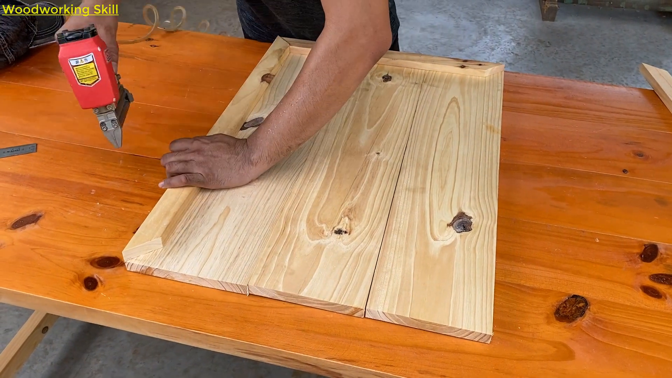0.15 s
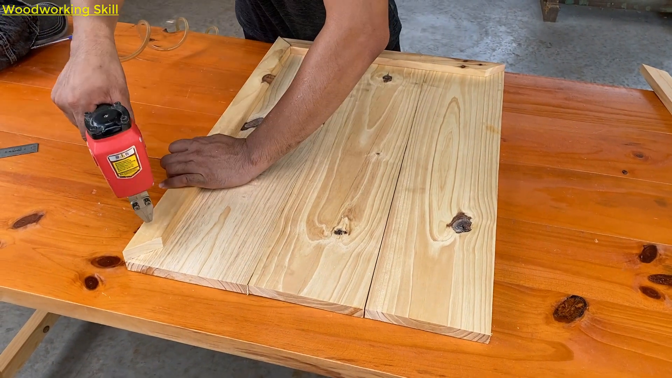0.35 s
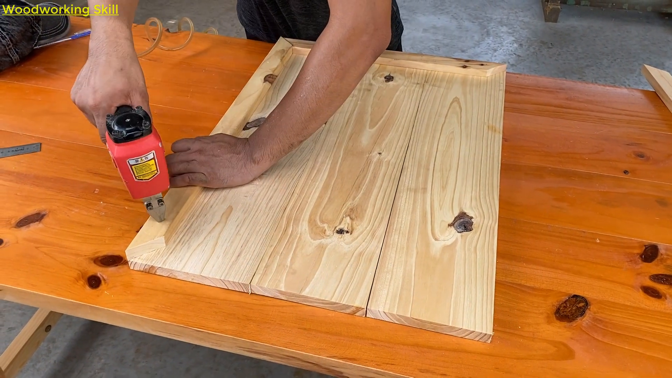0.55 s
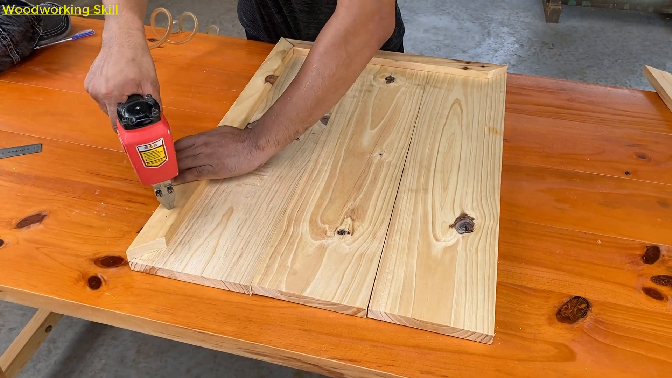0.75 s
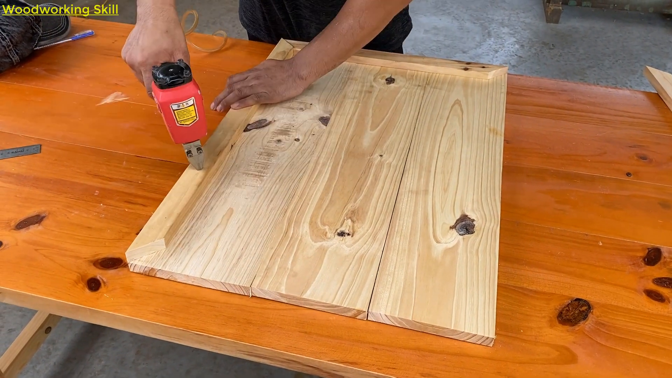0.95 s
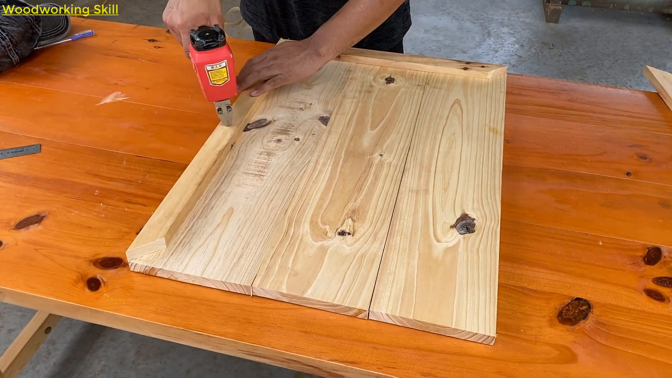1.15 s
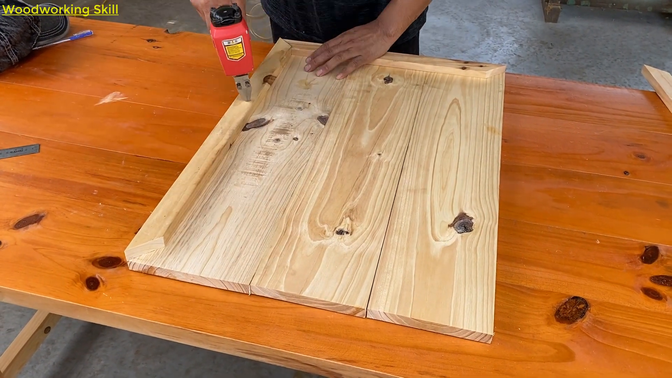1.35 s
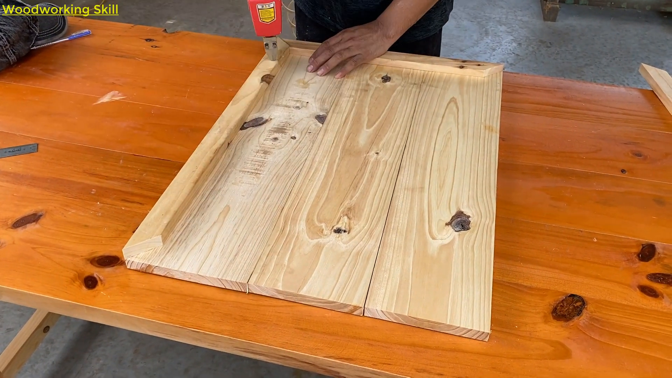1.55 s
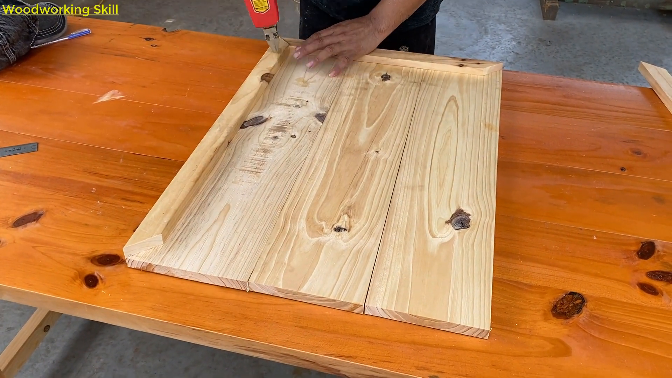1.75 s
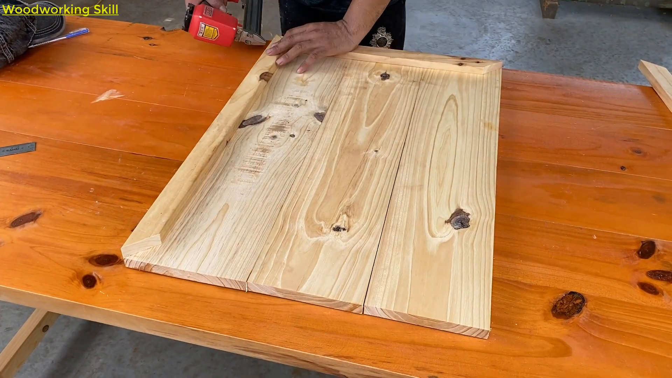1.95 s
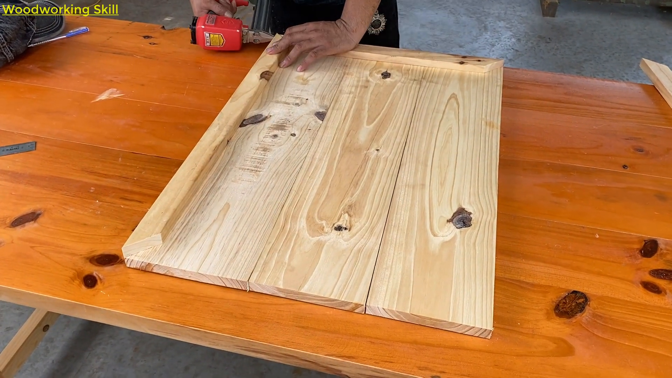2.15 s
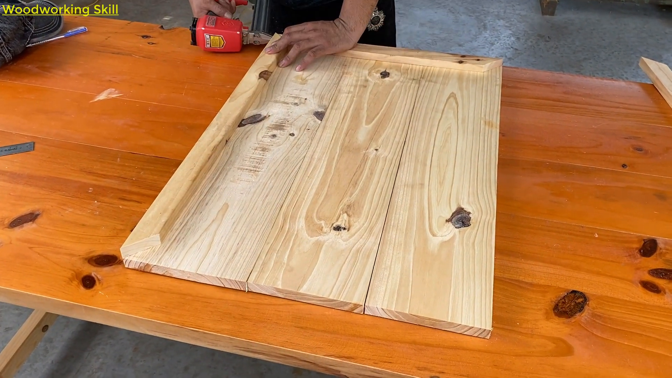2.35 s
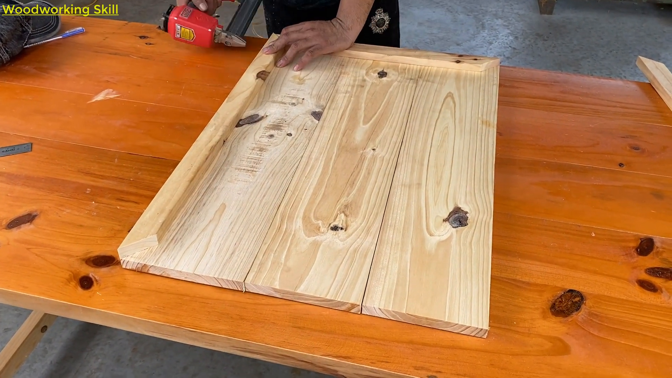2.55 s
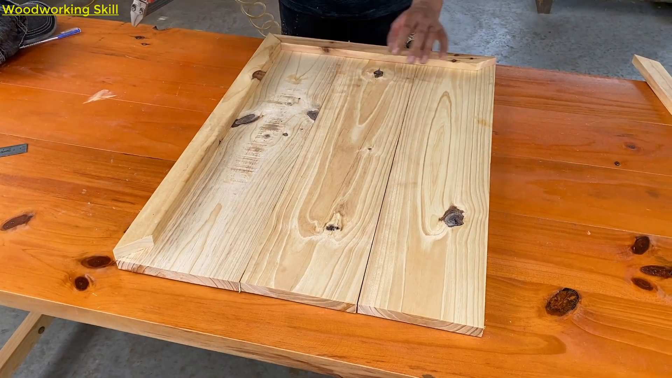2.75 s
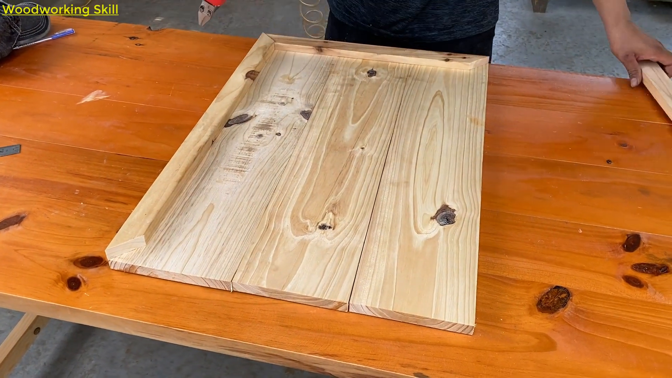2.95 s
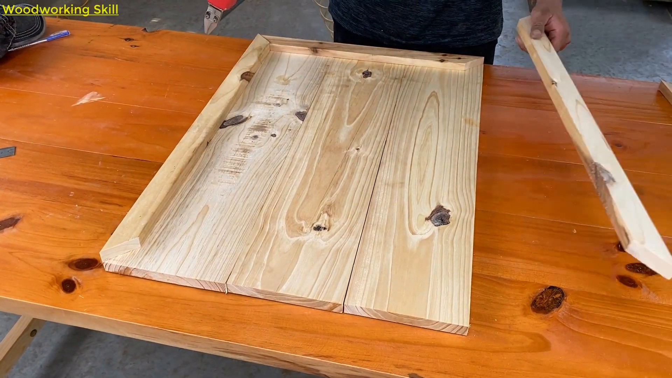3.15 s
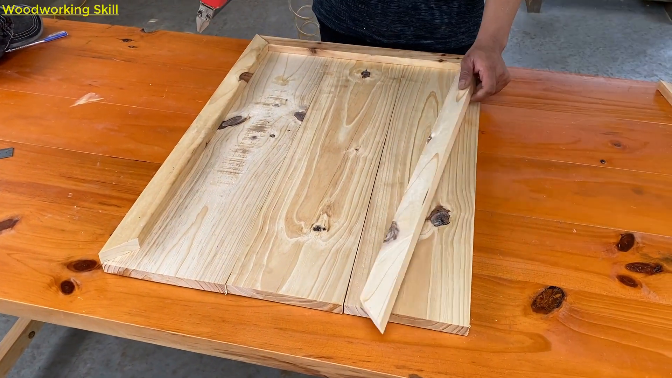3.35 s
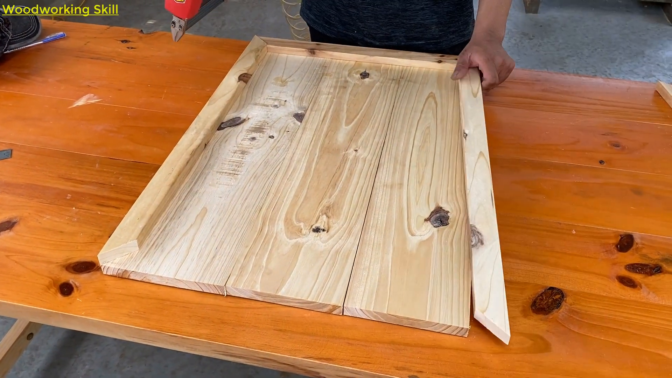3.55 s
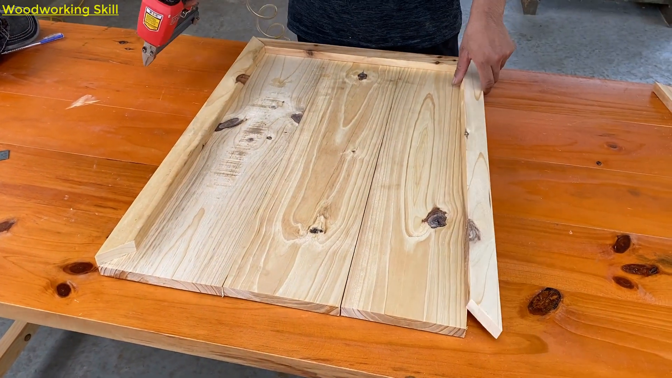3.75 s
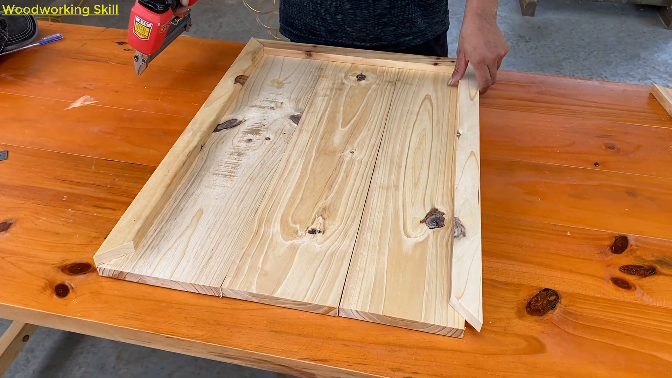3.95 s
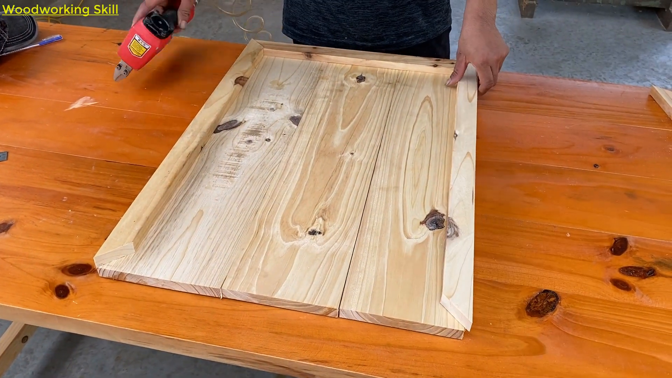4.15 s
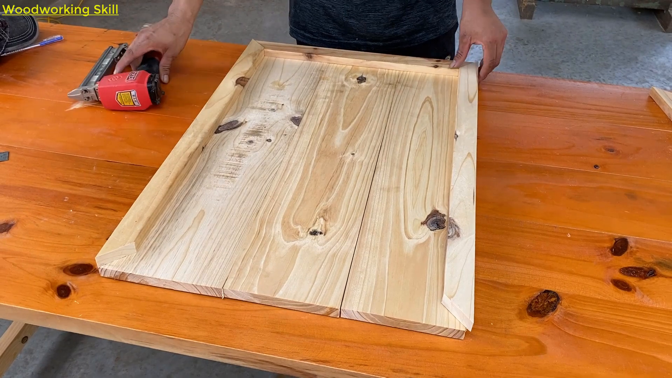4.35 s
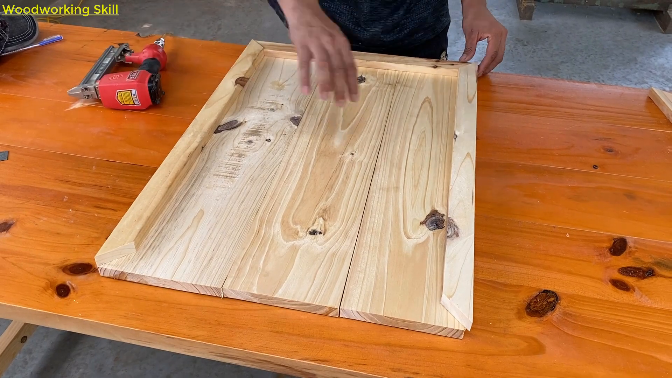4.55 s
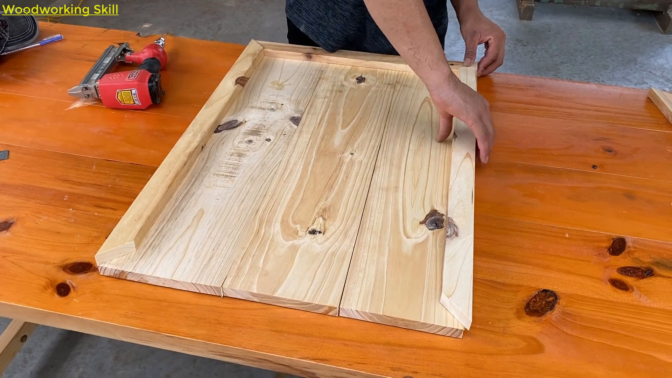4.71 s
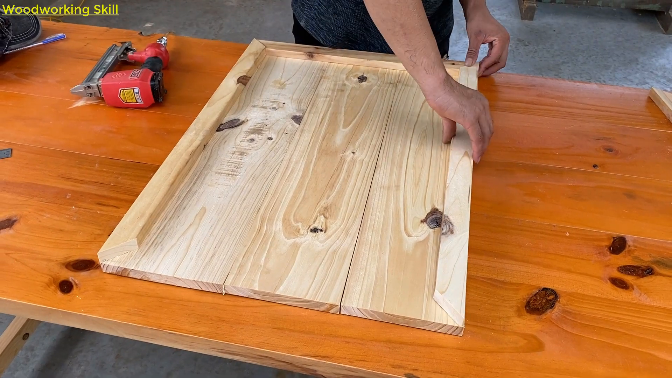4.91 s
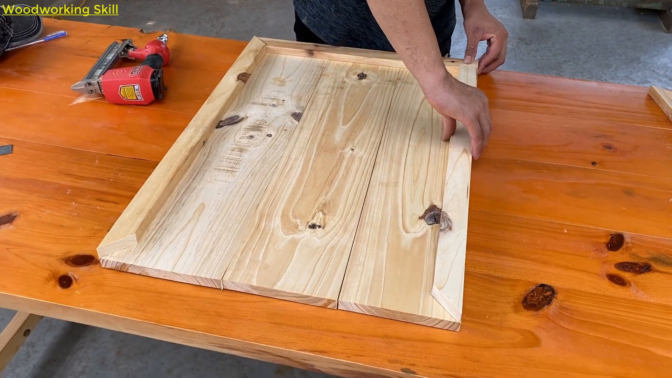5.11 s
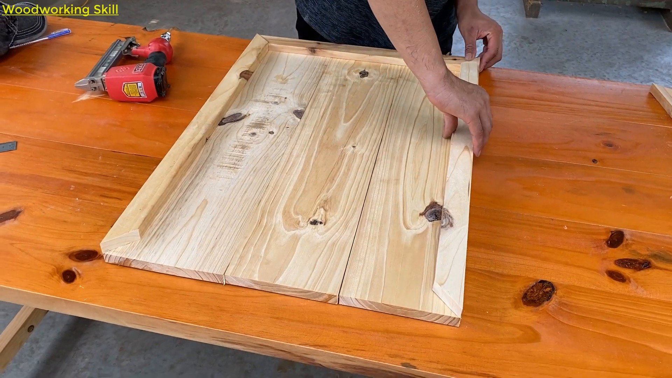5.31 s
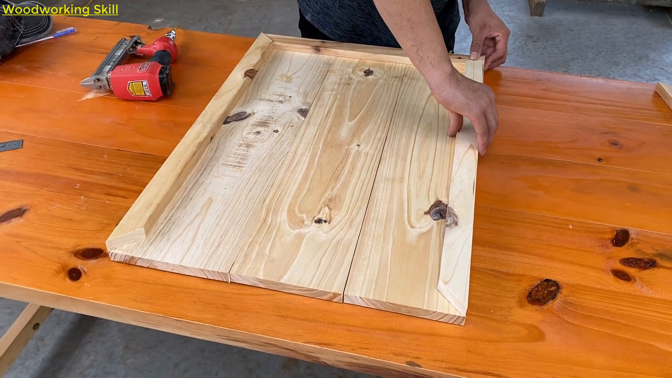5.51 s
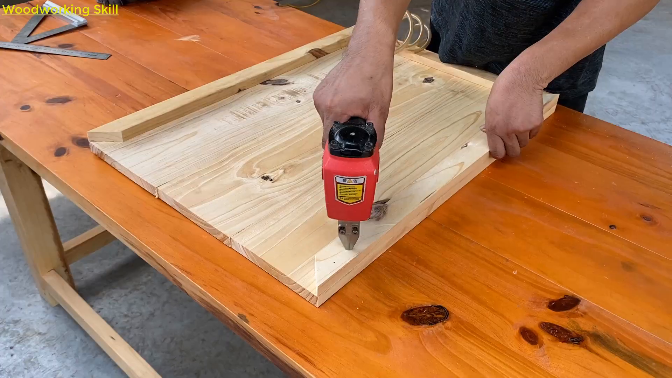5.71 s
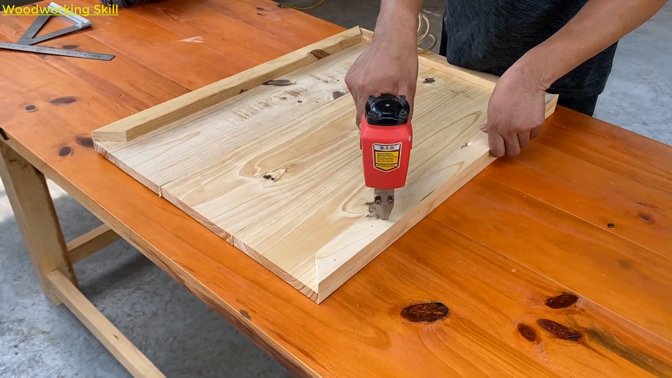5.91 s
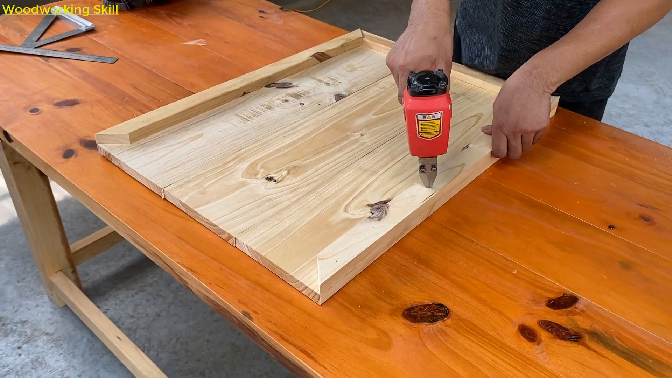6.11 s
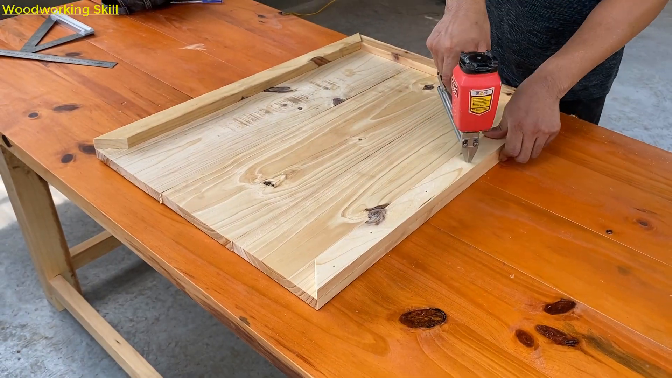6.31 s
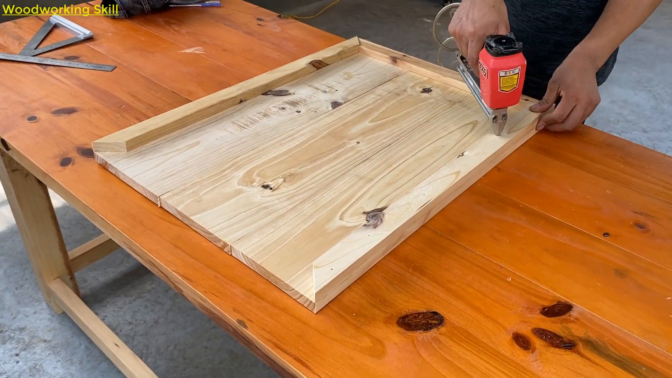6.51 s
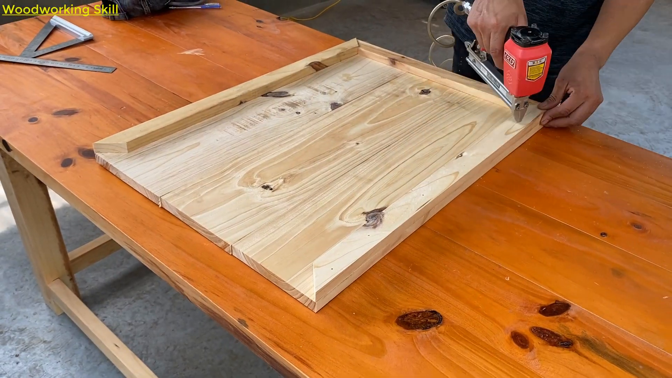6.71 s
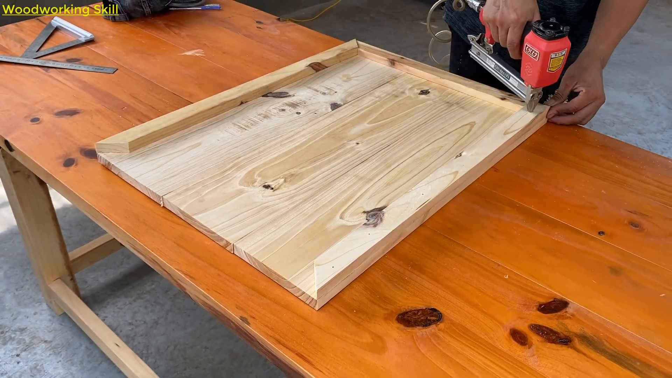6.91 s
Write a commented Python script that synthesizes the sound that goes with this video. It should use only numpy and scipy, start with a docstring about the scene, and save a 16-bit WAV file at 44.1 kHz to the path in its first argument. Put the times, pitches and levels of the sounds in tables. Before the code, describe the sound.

Quiet workshop air with low, lumpy rumble; soft hand bumps and a light knock at 0.2-0.46 s. A close nail gun fires at about 0.5, 0.7, 1.0, 1.3, 1.7 and 2.5 s: a tiny valve hiss, a very hard steel-and-wood crack, then about 70 ms later a sharp air spit with a low pop or thump and a clack. A faint thin spring ring and short diffuse room wash trail each shot. From 3 s it is quiet: a batten knocks on the panel at 3.4-3.75, sleeve and hose scuff around 4.0-4.4, and the gun is put down in clustered knocks at 4.27-4.5. Far dove-like coos recur faintly; whistles and tiny high chirps appear from 4.5 to 5.6. A 20 ms dropout at 5.74 returns in a dying ring, then five shots at 5.9, 6.15, 6.4, 6.65 and 6.97, with the earlier vents thumping harder.

```python
"""A pneumatic nail gun fixes battens to a pine panel on a workbench, in two short runs.
Each shot: valve hiss (noise), driver slam (noise cracks, damped wood and steel modes); some 70 ms later
the air vents as hiss and gliding pressure swings. Between runs a batten is laid on and the gun put down:
modal knocks, bumps and noise scuffs. A short dropout precedes the second run. The workshop answers with
a diffuse noise wash; gliding tones coo and whistle, noise chirps, over still air and low rumble."""
import sys
import numpy as np
from scipy import signal
from scipy.fft import rfft, irfft, next_fast_len
from scipy.io import wavfile
from scipy.ndimage import uniform_filter1d

SR = 44100
rng = np.random.default_rng(int(sys.argv[2]) if len(sys.argv) > 2 else 0)


def to_wav(s):
    """Save 16-bit WAV."""
    ch = np.atleast_2d(s).T  # columns
    pcm = np.round(np.clip(ch, -1, 1) * 32767)  # PCM
    wavfile.write(sys.argv[1], SR, pcm.astype(np.int16))


N = 311787
T = np.arange(SR // 2) / SR  # time since an event (s)
LEFT_RIGHT = np.array([[1], [-1]])  # opposite signs on the two sides


def amp(db):
    """Decibels to gain."""
    return 10 ** (np.asarray(db) / 20)


def unit(x):
    """Scale to rms 1."""
    return x / np.sqrt(np.mean(x ** 2) + 1e-20)


def burst(x, seconds):
    """Scale a short sound to the energy of rms 1 held for that long."""
    return x * np.sqrt(seconds * SR / np.mean(np.sum(x ** 2, -1)))


def along(points, hz):
    """Interpolate (Hz, value) points on a log-frequency axis."""
    point_hz, value = np.transpose(points)
    return np.interp(np.log(hz + 1), np.log(point_hz + 1), value)


def curve(rows):
    """Interpolate (s, value) rows to one value per sample."""
    return np.interp(np.arange(N) / SR, *np.transpose(rows))


def filtered(x, response):
    """Multiply the spectrum of x by a response of frequency."""
    n = x.shape[-1]
    padded = next_fast_len(n + 4096)
    spectrum = rfft(x, padded) * response(np.fft.rfftfreq(padded, 1 / SR))
    return irfft(spectrum, padded)[..., :n]


def noise(spectrum, size=len(T)):
    """Coloured mono noise of rms 1."""
    return unit(filtered(rng.standard_normal(size), lambda hz: amp(along(spectrum, hz))))


# Left-right likeness of diffuse sound. Each row: frequency in Hz, correlation 0-1.
LIKENESS = [(60, 1), (380, .9), (950, 0.73), (2400, 0.12), (6000, 0.2), (15000, 0.22)]


def diffuse(spectrum, size=len(T)):
    """Coloured noise from all sides: left and right are alike mainly in the bass."""
    def mid_side_gain(hz):
        angle = np.arccos(np.clip(along(LIKENESS, hz), -1, 1)) / 2
        return amp(along(spectrum, hz)) * [np.cos(angle), np.sin(angle)]

    mid, side = filtered(rng.standard_normal((2, size)), mid_side_gain)
    return unit(np.array([mid + side, mid - side]))


def swell(rise, t60):
    """An envelope that builds up and dies away (both in s)."""
    return (1 - np.exp(-(T / rise) ** 2)) * amp(-60 * T / t60)


def ring(modes, scatter_db=4.5, detune=0.066):
    """Damped modes; each blow lands elsewhere, so strengths and pitches vary."""
    hz, db, t60 = np.transpose(modes)[:, :, None]
    level_draw, pitch_draw = rng.standard_normal((2, len(modes), 1))
    sign = (-1) ** np.arange(len(modes))[:, None]
    decay = amp(db + scatter_db * level_draw - 60 * T / t60)
    tone = np.sin(2 * np.pi * hz * (1 + detune * pitch_draw) * T)
    return np.sum(sign * decay * tone, 0)


def wide(modes, side_db, **chance):
    """A large vibrating surface reaches each side a little differently."""
    middle = ring(modes, **chance)
    side = filtered(ring(modes, **chance), lambda hz: 1j)
    return middle + amp(side_db) * side * LEFT_RIGHT


def spray(spectrum, spread, size=SR // 8):
    """A short stretch of noise from a near source, partly scattered by the bench top."""
    sound = noise(spectrum, size=size) + spread * diffuse(spectrum, size=size)
    return np.pad(sound, [(0, 0), (0, len(T) - size)])


def add(track, s, sound, lag_ms=0):
    """Mix a sound in at time s (not before 0), reaching the left side lag_ms later than the right."""
    if lag_ms:
        sound = filtered(sound * np.ones((2, 1)),
                         lambda hz: np.exp(-1j * np.pi * hz * lag_ms / 1000 * LEFT_RIGHT))
    start = max(round(s * SR), 0)
    part = track[:, start:start + sound.shape[-1]]
    part += sound[..., :part.shape[-1]]


# Driver blows. Each row: time in s, batten level in dB, panel knock in dB, trigger hiss in dB.
SHOTS = [(.505, -24, -27.5, -34), (0.7006, -25.5, -36, -35.5), (1.008, -24, -40, -47.5),
         (1.2826, -24, -34.5, -36), (1.737, -25.5, -33, -38), (2.461, -20, -40.5, -44.5),
         (5.8915, -22.5, -30, -31), (6.1414, -24, -25.5, -31.5), (6.3848, -25.5, -34.5, -41.5),
         (6.6529, -22.5, -37.5, -44.5), (6.9703, -25.5, -43.5, -35.5)]
# Nominal modes of the nailed batten. Each row: frequency in Hz, level in dB, t60 in s.
BATTEN_MODES = [(437, -6.5, 0.033), (835, 1, .02), (1257, 5, 0.013), (1535, 3, 0.019), (2428, 2.5, 0.017),
                (3390, -4, 0.02), (4570, -4.5, 0.0087)]
# Nominal modes of the panel on the bench. Each row: frequency in Hz, level in dB, t60 in s.
PANEL_MODES = [(220, -3, 0.2), (293, -1.5, 0.36), (345.4, 0, 0.37), (440.4, 0, .05), (552, -3, 0.091),
               (700, -3, 0.05), (910, -2, 0.035), (1346, -6, 0.034)]
# Nominal modes of the bench top. Each row: frequency in Hz, level in dB, t60 in s.
BENCH_MODES = [(95, -7, 0.18), (111.26, 0.5, 0.12), (135, -1.5, 0.055), (194, -2.5, 0.073)]
# Nominal modes of the gun's spring and casing. Each row: frequency in Hz, level in dB, t60 in s.
SPRING_MODES = [(2560, -6, 0.65), (2645, -1.5, 0.73), (2690, -4.5, 0.32), (2330, -8, .4)]
# Steel crack spectrum. Each row: frequency in Hz, level in dB per Hz.
CRACK_SPECTRUM = [(30, -44.5), (200, -22), (700, 9), (1900, 1.5), (4000, 1), (4800, 6.5), (6800, -3),
                  (8600, 3), (11000, 0.5), (14000, 0), (16000, -9)]
# Trigger valve hiss spectrum. Each row: frequency in Hz, level in dB per Hz.
TRIGGER_SPECTRUM = [(300, -21), (2000, -9), (4000, -10), (6000, -3.5), (8000, -3.5), (10000, -2.5),
                    (13000, -2.5), (16000, -9.5)]
CRACK_DB, SPRING_DB = -22, -60.5  # the driver's steel hits equally hard every time
FIRM_KNOCK_DB, BOOM_AT_FIRM_DB, BOOM_DB_PER_KNOCK_DB = -35.5, -49.5, 2


def shots():
    """The valve opens, the driver hits the nail, and the piston slams on its stop."""
    out = np.zeros((2, N))
    for s, wood_db, knock_db, hiss_db in SHOTS:
        boom_db = BOOM_AT_FIRM_DB + BOOM_DB_PER_KNOCK_DB * (knock_db - FIRM_KNOCK_DB)

        hiss = spray(TRIGGER_SPECTRUM, spread=1.0) * swell(rise=0.006, t60=0.23)
        add(out, s - .019, amp(hiss_db) * burst(hiss, 0.008))

        batten = wide(BATTEN_MODES, side_db=-14, scatter_db=2, detune=0.073) * swell(rise=0.0005, t60=0.51)
        add(out, s, amp(wood_db) * burst(batten, 0.0088))

        # steel on steel: a first contact, then the stop a moment later
        contact = spray(CRACK_SPECTRUM, spread=0.93) * swell(rise=0.00077, t60=0.0032)
        add(out, s + 0.00077, amp(CRACK_DB) * burst(contact, 0.0035))
        stop = spray(CRACK_SPECTRUM, spread=1.2) * swell(rise=0.00048, t60=0.028)
        add(out, s + 0.002, amp(CRACK_DB) * burst(stop, 0.005))

        panel = wide(PANEL_MODES, side_db=-12.0) * swell(rise=0.00045, t60=.06)
        add(out, s + .001, amp(knock_db) * burst(panel, 0.037))
        bench = wide(BENCH_MODES, side_db=-12) * swell(rise=0.00091, t60=0.069)
        add(out, s + 0.0007, amp(boom_db) * burst(bench, 0.008))
        spring = wide(SPRING_MODES, side_db=-4.5, detune=0.0013) * swell(rise=.001, t60=1.5)
        add(out, s, amp(SPRING_DB) * spring)
    return out


def puff(start_hz, end_hz, sag, rise, t60):
    """A slug of air: pressure swings that slow over sag (s) as the cylinder empties; pitch varies."""
    hz = end_hz + (start_hz - end_hz) * np.exp(-T / sag)
    pitch = np.exp(0.11 * rng.standard_normal())
    return -np.sin(2 * np.pi * np.cumsum(hz) / SR * pitch) * swell(rise, t60)


# Exhausts. Each row: time in s, hiss level in dB, pop in dB, thump in dB.
VENTS = [(.582, -17, -33, -30), (0.7682, -16.5, -20.5, -29), (1.076, -18, -38, -25.5),
         (1.3508, -20, -21, -29.5), (1.8086, -20.5, -37, -30.5), (2.5275, -17.5, -34.5, -32.5),
         (5.9535, -14, -22.5, -22.5), (6.2072, -14.5, -23.5, -21.5), (6.4454, -17.5, -25.5, -23.5),
         (6.7263, -19, -23, -36), (7.055, -20, -34.5, -30.5)]
# Exhaust hiss spectrum. Each row: frequency in Hz, level in dB per Hz.
EXHAUST_SPECTRUM = [(200, -11), (1200, 4.5), (2000, -3.5), (3300, -3.5), (7000, -8.5), (10000, -3.5),
                    (13000, 0), (16000, 1)]
# Piston clack spectrum. Each row: frequency in Hz, level in dB per Hz.
CLACK_SPECTRUM = [(150, -17.5), (600, -7), (1500, -6), (1900, -6), (2450, 5), (3200, -18), (4700, -4.5),
                  (7000, -10.5), (16000, -13)]
# Air through the exhaust cap. Each row: frequency in Hz, level in dB per Hz.
BLEED_SPECTRUM = [(100, -44), (1000, -22), (1900, -13.5), (2450, -6.5), (2670, 1), (2950, -12),
                  (4500, -13.5), (6500, -20.5), (10000, -13.5), (14000, -13), (16000, -21)]
BLEED_DB, BLEED_T60_S = -51, 0.37  # the last air bleeds away after each vent


def vents():
    """The trigger is let go: air spits out, thumps, and the piston clacks home."""
    out = np.zeros((2, N))
    for s, hiss_db, pop_db, thump_db in VENTS:
        spit = spray(EXHAUST_SPECTRUM, spread=0.42) * swell(rise=0.0024, t60=0.017)
        add(out, s - .006, amp(hiss_db - 19) * burst(spit, 0.0054))
        hiss = spray(EXHAUST_SPECTRUM, spread=0.98) * swell(rise=0.00072, t60=0.015)
        add(out, s, amp(hiss_db) * burst(hiss, 0.0023))

        pop = puff(start_hz=941, end_hz=295.5, sag=0.0026, rise=0.0029, t60=0.012)
        thump = puff(start_hz=265, end_hz=107.2, sag=0.0036, rise=0.0012, t60=0.039)
        # the jet points a new way each time, so it favours one side
        aim = amp(LEFT_RIGHT * (1.05 + .6 * rng.standard_normal()))
        add(out, s + .0015, aim * amp(pop_db) * burst(pop, 0.0049))
        add(out, s + 0.0031, aim * amp(thump_db) * burst(thump, .014), lag_ms=0.13 * rng.standard_normal())

        clack = spray(CLACK_SPECTRUM, spread=0.36) * swell(rise=0.0014, t60=0.0058)
        add(out, s + 0.0079, amp(-31.5) * burst(clack, 0.003))
        bleed = diffuse(BLEED_SPECTRUM) * swell(rise=.006, t60=BLEED_T60_S)
        add(out, s + 0.0052, amp(BLEED_DB) * bleed)

        # a hard pop shakes the spring again
        spring = wide(SPRING_MODES, side_db=-3.0, detune=0.0011) * swell(rise=0.0017, t60=1.5)
        add(out, s + 0.014, amp(pop_db - 36) * spring)
        valve = spray(TRIGGER_SPECTRUM, spread=0.39) * swell(rise=0.0064, t60=0.031)
        add(out, s + 0.004, amp(hiss_db - 14.5) * burst(valve, 0.0015))
        bench = wide(BENCH_MODES, side_db=-13) * swell(rise=0.03, t60=3)
        add(out, s + 0.012, amp(thump_db - 27) * burst(bench, 0.03))
    return out


GAP_START_S, GAP_END_S = 5.7405, 5.762  # the dropout
# Left port's lead for the gun before the dropout. Each row: frequency in Hz, phase in rad.
LEAD_FIRST = [(150, .05), (600, .25), (1400, .65), (3000, -0.67), (5500, 1.2), (9500, -0.77), (14000, -.4)]
# Left port's lead for the gun after it. Each row: frequency in Hz, phase in rad.
LEAD_SECOND = [(150, .02), (1400, .35), (5500, 0.094), (9500, -0.97), (14000, -1.9)]


def ports(x):
    """The two microphone ports catch the gun out of step, differently in each run."""
    first = np.arange(N) / SR < GAP_START_S
    out = np.zeros((2, N))
    for run, lead in [(first, LEAD_FIRST), (~first, LEAD_SECOND)]:
        out += filtered(x * run, lambda hz: np.exp(.5j * along(lead, hz) * LEFT_RIGHT))
    return out


def afterring():
    """After the dropout the sound returns in the dying ring of a shot: noise wash and spring modes."""
    out = np.zeros((2, N))
    # (Hz, dB per Hz)
    colour = [(40, 4), (100, 8.5), (200, 5.5), (700, -3.5), (1300, -8), (2500, -5.5), (3500, -10.5),
              (7000, -14.5), (12000, -9.5), (16000, -10.5)]
    wash = diffuse(colour) * swell(rise=0.00068, t60=0.4)
    spring = ring(SPRING_MODES, detune=0.0015)
    add(out, GAP_END_S, amp(-44.5) * wash + amp(-57.0) * spring)
    return out


# Batten and gun set on wood. Each row: time in s, rap level in dB, panel level in dB.
KNOCKS = [(.2435, -56.5, -73), (0.4612, -56.5, -40), (2.108, -74, -69.5), (2.258, -80.5, -65.5),
          (3.045, -63.5, -58.5), (3.401, -33, -37.5), (3.54, -49, -47.5), (3.66, -73.5, -57.5),
          (3.75, -59, -47), (4.293, -43.5, -31), (4.316, -40.5, -35), (4.361, -58.5, -45.5),
          (4.391, -58, -39), (4.416, -51.5, -38.5), (4.503, -41, -37), (4.764, -69, -64.5),
          (6.102, -53.5, -72)]
# Wood contact spectrum. Each row: frequency in Hz, level in dB per Hz.
WOOD_SPECTRUM = [(30, -49.5), (150, -21), (600, -3.5), (1400, 5), (2300, -1.5), (3500, -13), (6000, -16),
                 (16000, -43.5)]
CLICK_RE_RAP_DB = -19
# as the gun is put down, its steel nose touches first
NOSE_S, NOSE_RAP_DB, NOSE_PANEL_DB, NOSE_CLICK_DB = 4.265, -44.5, -44, -38.5
PANEL_LIGHT_HZ = 324  # a light contact hardly moves the panel below this


def knocks():
    """Wood and gun knock on the panel: noise raps and clicks, batten and panel modes, a second edge."""
    out = np.zeros((2, N))
    contacts = [(s, db, panel_db, db + CLICK_RE_RAP_DB) for s, db, panel_db in KNOCKS]
    contacts.append((NOSE_S, NOSE_RAP_DB, NOSE_PANEL_DB, NOSE_CLICK_DB))
    for s, db, panel_db, click_db in contacts:
        rap = burst(spray(WOOD_SPECTRUM, spread=.7) * swell(rise=.0005, t60=.04), .003)
        batten = burst(ring(BATTEN_MODES, scatter_db=3.0), 0.0023)
        panel = filtered(wide(PANEL_MODES, side_db=-12, scatter_db=3.5, detune=0.048),
                         lambda hz: (1j * hz / (1j * hz + PANEL_LIGHT_HZ)) ** 2)
        panel = burst(panel * swell(rise=.0008, t60=.45), 0.008)
        click = burst(spray(TRIGGER_SPECTRUM, spread=.9) * swell(rise=0.00053, t60=0.012), 0.0028)
        add(out, s, amp(db) * (rap + batten) + amp(panel_db) * panel + amp(click_db) * click)

        # the other edge lands a few milliseconds later
        edge = spray(WOOD_SPECTRUM, spread=0.92) * swell(rise=.001, t60=.07)
        add(out, s + rng.uniform(0.0037, 0.0088), amp(db + 0.5) * burst(edge, 0.002))
    return out


# A hand settles on the bench. Each row: start in s, time between contacts in s, first contact in dB.
BUMPS = [(.197, 0.037, -53.5), (0.289, 0.033, -38), (1.426, 0.071, -46), (2.108, 0.14, -57),
         (3.158, .058, -57.5), (5.705, 0.016, -44.5)]
SETTLE_DB = 2.5  # each contact is this much softer than the last


def bumps(count):
    """A hand meets the bench in a few ever softer contacts, each ringing the bench modes."""
    out = np.zeros((2, N))
    for s, gap, db in BUMPS:
        for k in range(count):
            bench = wide(BENCH_MODES, side_db=-11.5, detune=0.12) * swell(rise=0.0045, t60=0.34)
            add(out, s + k * gap, amp(db - k * SETTLE_DB) * burst(bench, 0.018))
    return out


# Hose, sleeve and palm. Each row: start in s, length in s, level in dB, share of palm on wood 0-1.
SCUFFS = [(0.172, .11, -62.5, 0.67), (1.388, 0.19, -61.5, 0.95), (2.922, 0.28, -70, 0.28),
          (3.703, .075, -61, 0.42), (3.978, 0.17, -63.5, 0.13), (4.1, 0.28, -57, 0.1),
          (4.349, 0.14, -57.5, 0.63), (4.92, 0.51, -76.5, 0.8)]
# Sliding hose and sleeve spectrum. Each row: frequency in Hz, level in dB per Hz.
SLIDE_SPECTRUM = [(590, -39), (1000, -19), (1080, -8), (2260, 3.5), (3150, 7), (5780, 7), (15500, -4.5)]


def scuffs():
    """Hose, sleeve and palm slide in grainy strokes that swell and fade; on wood they sound duller."""
    out = np.zeros((2, N))
    for s, length, db, wood in SCUFFS:
        grain = unit(filtered(rng.standard_normal(len(T)), lambda hz: np.exp(-hz / 120)))
        stroke = np.abs(np.sin(np.pi * np.clip(T / length, 0, 1) ** 1.15)) ** 1.57
        rub = (1 - wood) * diffuse(SLIDE_SPECTRUM) + wood * diffuse(WOOD_SPECTRUM)
        add(out, s, amp(db) * stroke * unit(amp(3.4 * grain) * rub))
    return out


# Room decay. Each row: frequency in Hz, t60 in s.
ROOM_T60 = [(80, 0.33), (300, 0.22), (1000, 0.24), (2500, 0.26), (5000, 0.21), (9000, 0.16), (15000, 0.24)]
# Room colour. Each row: frequency in Hz, gain in dB.
ROOM_COLOUR = [(60, -20.5), (170, -17), (300, -3.5), (800, -5.5), (1400, -3), (2500, 2), (4000, 3.5),
               (7000, -4), (10000, 0.5), (15000, -6)]


def workshop(x, wet_db):
    """The room stores the energy of each band and lets it out as a diffuse, dying wash."""
    frames = dict(fs=SR, nperseg=512, noverlap=384)
    hz, t, z = signal.stft(x.mean(0), **frames)
    power = np.abs(z) ** 2
    # treble leaves the source differently in every direction, so its fine colour averages out
    blur = np.clip(hz / 3500, 0, 1)[:, None]
    power = (1 - blur) * power + blur * np.abs(uniform_filter1d(power, size=15, axis=0))
    # share of energy kept from frame to frame
    keep = amp(-60 * t[1] / along(ROOM_T60, hz)) ** 2
    stored = np.array([signal.lfilter([1 - k], [1, -k], band) for k, band in zip(keep, power)])
    wash = signal.stft(diffuse([(20, 0), (20000, 0)], size=N), **frames)[2]
    wash = wash / np.sqrt(np.mean(np.abs(wash) ** 2))
    wash = wash * np.sqrt(stored) * amp(along(ROOM_COLOUR, hz))[:, None]
    out = np.zeros((2, N))
    add(out, .005, amp(wet_db) * signal.istft(wash, **frames)[1])
    return out


def call(length, start_hz, end_hz, waver, bend=1):
    """One gliding note (larger bend glides later), made to flutter and waver (rad) by its long way here."""
    u = np.linspace(0, 1, max(round(length * SR), 2))
    slow = filtered(rng.standard_normal((2, len(T))), lambda hz: np.exp(-(hz / (0.045 * start_hz)) ** 2))
    flutter, drift = unit(slow)[:, :len(u)]
    phase = 2 * np.pi * np.cumsum(start_hz + (end_hz - start_hz) * u ** bend) / SR
    return np.abs(np.sin(np.pi * u)) ** 0.8 * amp(3.5 * flutter) * np.sin(phase + waver * drift)


# A far dove. Each row: start in s (clamped to 0), length in s, starting pitch in Hz, level in dB.
COOS = [(-.08, 0.087, 650, -68), (1.1, 0.34, 680, -65), (1.863, 0.17, 668, -71), (2.367, 0.32, 612, -68),
        (3.029, .35, 665, -70), (3.764, 0.23, 655, -67), (5.022, 0.32, 608, -67)]
COO_SAG = .08  # each coo holds its pitch, then bends down by this share
# Another bird. Each row: start in s, length in s, start pitch in Hz, end pitch in Hz.
WHISTLES = [(4.543, .21, 2330, 2460), (4.714, 0.43, 2430, 2223), (5.08, .31, 2350, 2340),
            (5.357, 0.23, 1320, 1342)]
WHISTLE_DB, WHISTLE_DB_PER_OCTAVE = -62.5, 9.5  # level at the first whistle's pitch; lower is softer
# Settled chirp spectrum. Each row: frequency in Hz, level in dB per Hz.
CHIRP_SPECTRUM = [(7500, -38), (9400, -13), (10150, 0.5), (10900, -8), (12500, -34)]
CHIRP_START_S, CHIRP_PERIOD_S, CHIRP_LENGTH_S, CHIRP_DB = 4.625, 0.165, 0.1, -81
CHIRP_SAG, CHIRP_SAG_S = 0.06, 0.13  # the first chirp is this share higher; the run soon settles


def birds(count):
    """Far coos and whistles are gliding tones, left side first; high chirps are diffuse noise."""
    out = np.zeros((2, N))
    for s, length, hz, db in COOS:
        coo = call(length, hz, hz * (1 - COO_SAG), waver=.7, bend=2.5)
        add(out, s, amp(db) * coo, lag_ms=-0.17)
    for s, length, start_hz, end_hz in WHISTLES:
        db = WHISTLE_DB + WHISTLE_DB_PER_OCTAVE * np.log2(start_hz / WHISTLES[0][2])
        add(out, s, amp(db) * call(length, start_hz, end_hz, waver=0.86), lag_ms=-0.152)
    arch = np.sin(np.pi * np.clip(T / CHIRP_LENGTH_S, 0, 1))
    for k in range(count):
        pitch = 1 + CHIRP_SAG * np.exp(-k * CHIRP_PERIOD_S / CHIRP_SAG_S)
        chirp = arch * diffuse([(pitch * hz, db) for hz, db in CHIRP_SPECTRUM])
        add(out, CHIRP_START_S + k * CHIRP_PERIOD_S, amp(CHIRP_DB) * chirp)
    return out


# Still air spectrum. Each row: frequency in Hz, level in dB per Hz.
AIR_SPECTRUM = [(15, -50.5), (25, -28.5), (108, -3), (195, 2), (249, -4), (293, 1.5), (796, -17.5),
                (1190, -20.5), (1330, -21.5), (3620, -23), (4490, -21.5), (5430, -29), (7500, -35),
                (10100, -34), (12900, -48), (16000, -48.5)]
# Low rumble of the work. Each row: time in s, level in dB before trim and lumps.
RUMBLE_LEVEL = [(0.0, -90), (0.21, -62), (0.49, -58), (1.06, -68.5), (1.46, -55.5), (2.89, -83),
                (3.11, -73), (4.43, -68.5), (4.75, -78), (5.51, -74), (6.1, -55), (7.07, -70)]
RUMBLE_TRIM_DB, LUMPS_DB, LUMPS_HZ = -2.5, 4, 18  # lumps: rms depth and pace


def background():
    """Still workshop air and a low, lumpy rumble, both diffuse noise."""
    lumps = unit(filtered(rng.standard_normal(N), lambda hz: np.exp(-(hz / LUMPS_HZ) ** 2)))
    # (Hz, dB per Hz)
    rumble = diffuse([(25, -40.5), (60, -21.0), (95, -0.5), (140, -4), (220, -13.5), (400, -23.0),
                      (1500, -56.5)], size=N)
    rumble_db = curve(RUMBLE_LEVEL) + RUMBLE_TRIM_DB + LUMPS_DB * lumps
    return amp(-69.5) * diffuse(AIR_SPECTRUM, size=N) + amp(rumble_db) * rumble


def scene():
    """Gun and handling, close by, in the workshop."""
    gun = shots() + vents()
    handling = knocks() + bumps(count=3) + scuffs()
    near = ports(gun) + handling
    room = workshop(gun + handling, wet_db=-10.0)
    return near + room + background() + birds(count=7) + afterring()


TOP_HZ = 15900  # middle of the band-limit slope


def record(dry):
    """A brief dropout; the microphone sheds deep bass, rounds the highest peaks and has a band limit."""
    t = np.arange(N) / SR
    highpass = signal.butter(2, 28, "highpass", fs=SR, output="sos")
    heard = signal.sosfilt(highpass, dry) * ((t < GAP_START_S) | (t > GAP_END_S))
    heard = heard / (1 + (heard / .6) ** 4) ** .25
    return filtered(heard, lambda hz: np.clip((TOP_HZ - hz) / 500 + .5, 0, 1))


dry = scene()
out = record(dry)
to_wav(out)
```